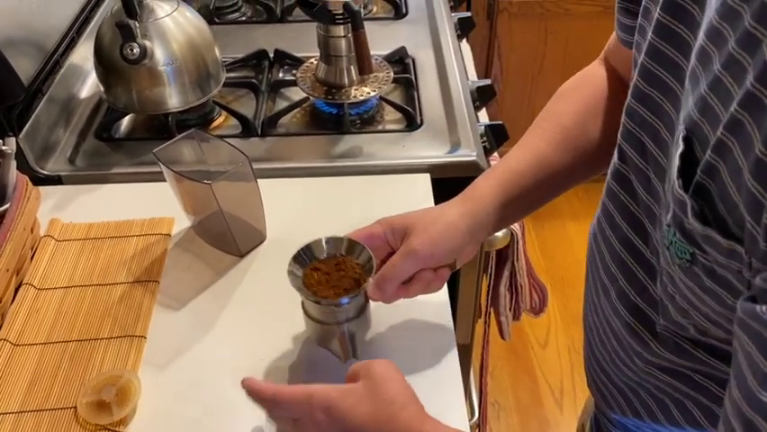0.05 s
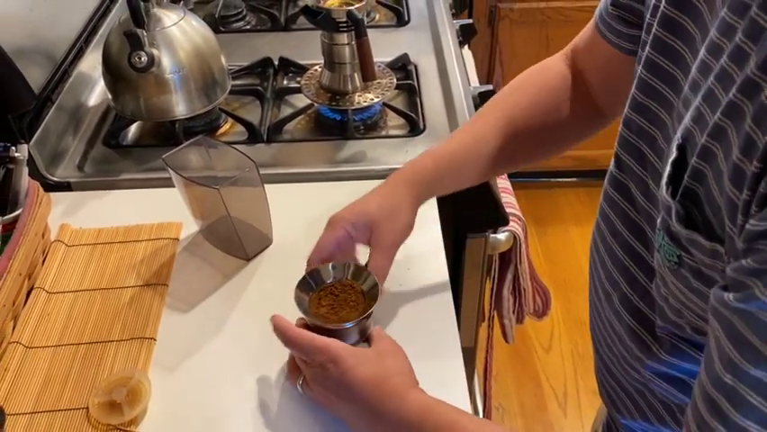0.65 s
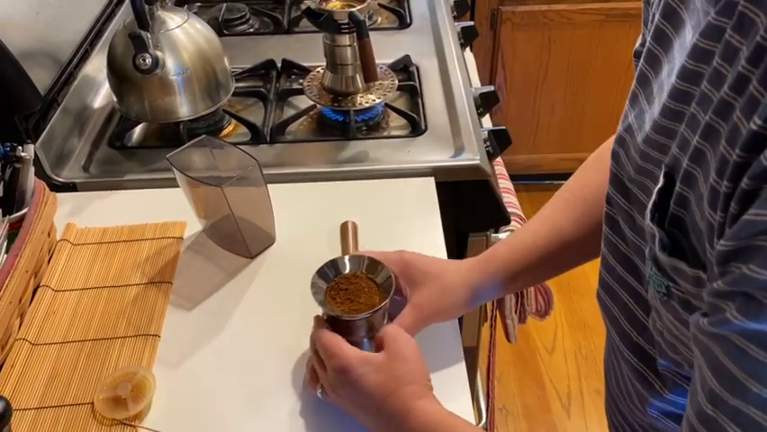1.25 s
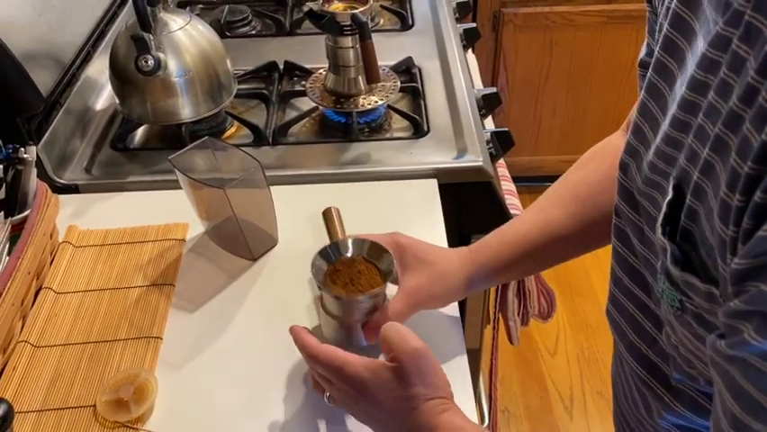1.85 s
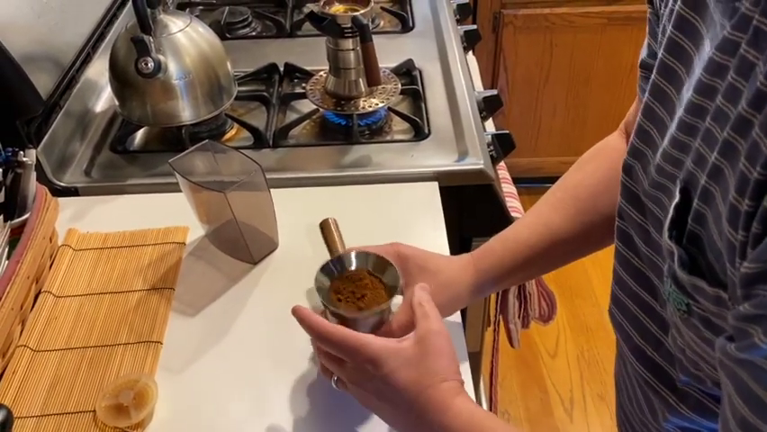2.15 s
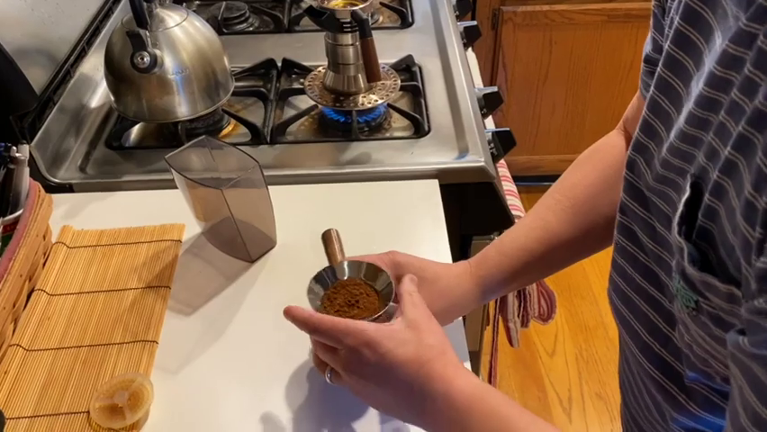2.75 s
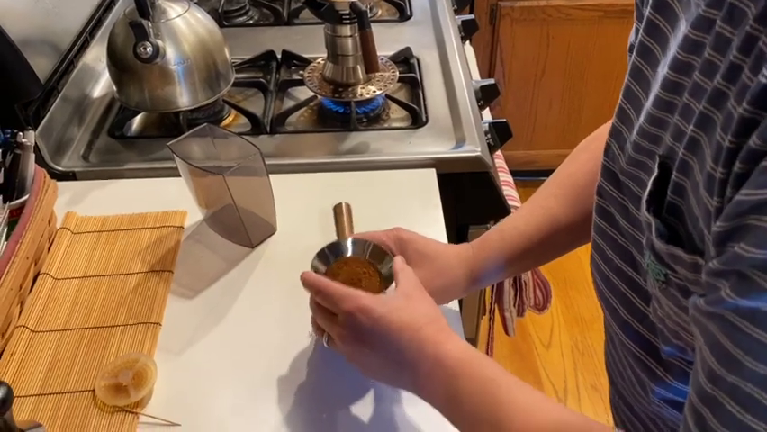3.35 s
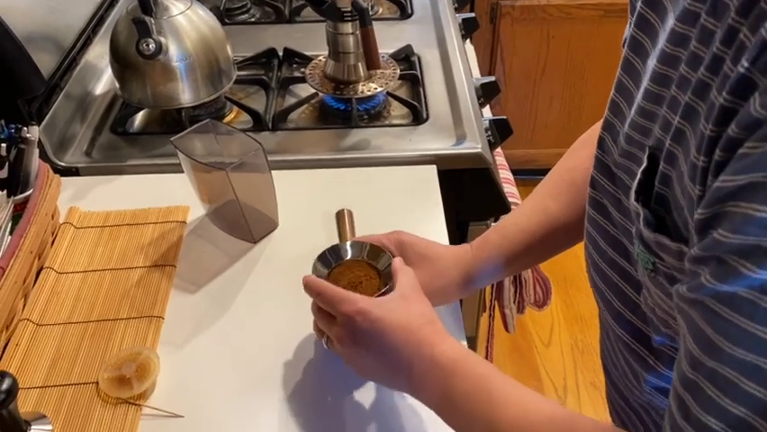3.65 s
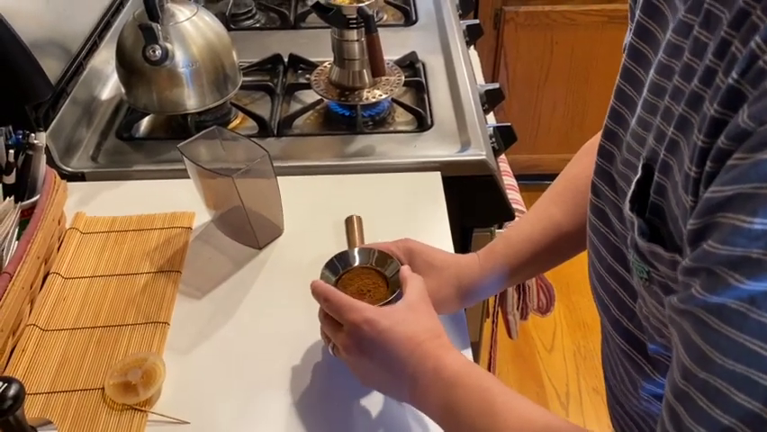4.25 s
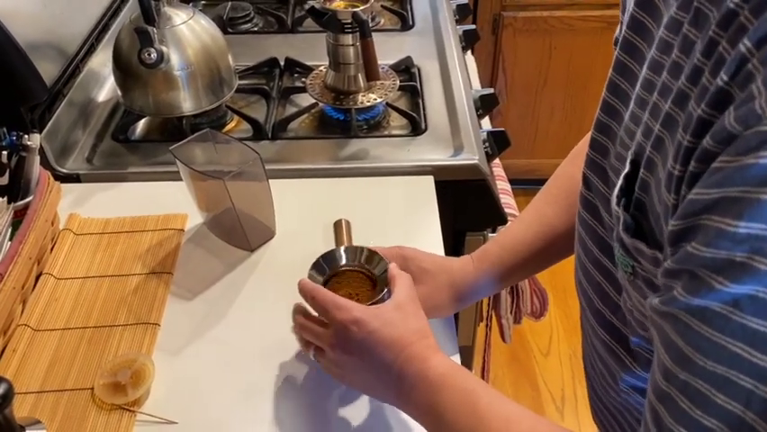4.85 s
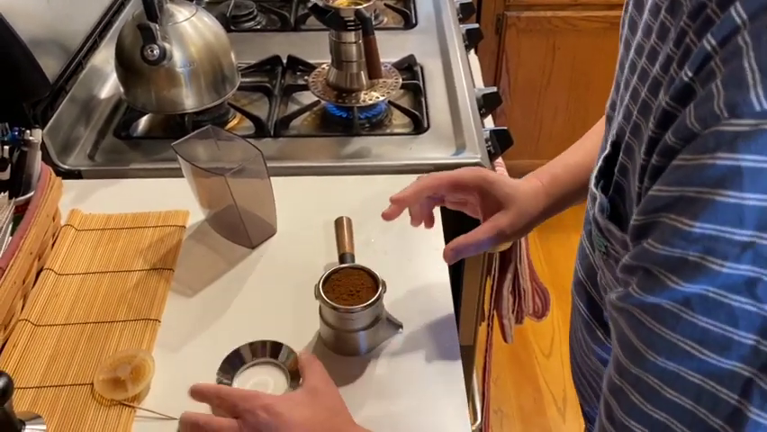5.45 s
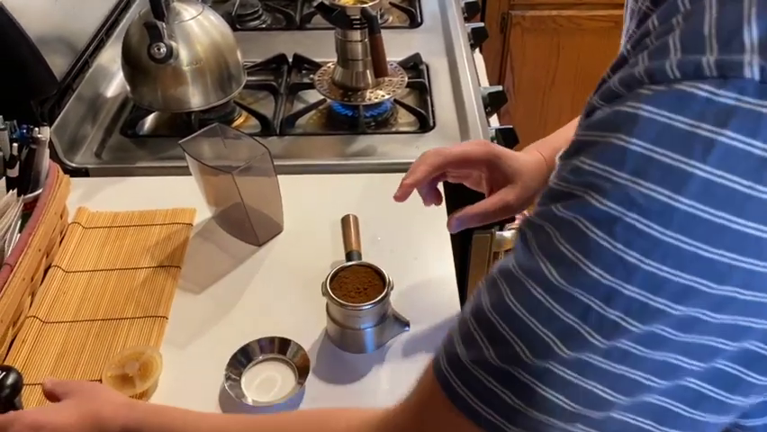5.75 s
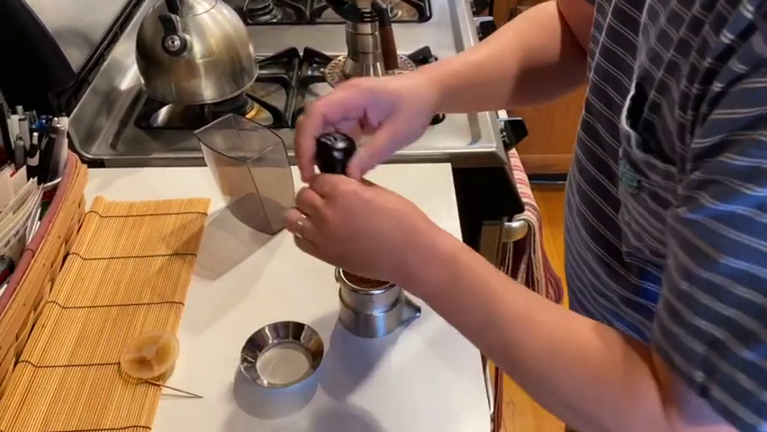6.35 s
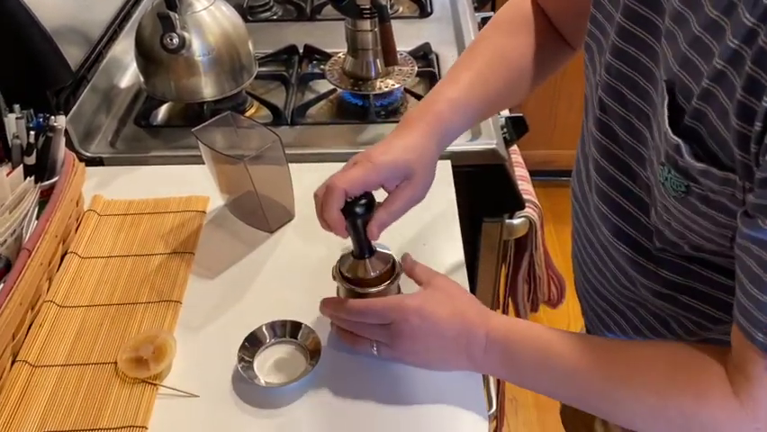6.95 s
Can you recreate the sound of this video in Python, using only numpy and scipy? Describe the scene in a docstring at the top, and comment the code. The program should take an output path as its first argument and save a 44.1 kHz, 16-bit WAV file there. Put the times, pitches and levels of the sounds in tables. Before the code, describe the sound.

In a small kitchen with a steady appliance hum and a faint gas flame hiss, coffee grounds are shaken level in a steel holder, its funnel buzzing on the rim. The holder lands softly, slides a little and is shaken again in a quick rhythm. It is then knocked hard on the counter seven times, and the funnel clatters briefly as it is set down. Everything is close and toward the left.

```python
"""A steel coffee basket in its holder, a dosing funnel on top, is shaken level and knocked on a counter.
The grounds slide and the loose funnel rattles on the rim; a few soft landings and seven firm knocks
ring the holder and boom in the cabinet. The funnel is lifted off and laid down, ringing; the tamper
is picked up faintly. Close stereo microphone, the handling to its left, in a small, live kitchen
where an appliance hums and a gas flame hisses softly."""
import sys
import numpy as np
from scipy import signal
from scipy.fft import rfft, irfft
from scipy.io import wavfile

SR = 44100
rng = np.random.default_rng(int(sys.argv[2]) if len(sys.argv) > 2 else 0)


def dump(signal):
    """Clip the signal to [-1, 1] and save it as 16-bit WAV at the path in sys.argv[1]."""
    limited = np.clip(np.atleast_2d(signal).T, -1, 1)
    pcm = np.round(limited * 32767).astype(np.int16)
    wavfile.write(sys.argv[1], SR, pcm)


N = 308259
T = np.arange(2 ** 15) / SR  # the time axis of one blow

# modes of the steel funnel, before fingers, basket or counter damp it: pitch_hz, relative_db, t60_s
FUNNEL_MODES = [(2140, -31.5, 0.15), (3360, -16.5, 0.27), (5830, -11.5, 0.4), (9960, 1, 0.35),
                (10060, -0.5, 0.053), (10070, -4, .1), (10850, -8, 0.23), (11300, -2.5, 0.052),
                (13880, 6.5, 0.041), (14150, -1, 0.064), (15240, 2, 0.086), (15510, 4.5, 0.043)]


def amp(db):
    """Decibels to gain."""
    return 10 ** (np.asarray(db) / 20)


def read(points, hz):
    """A table joined by straight lines over log frequency."""
    f, value = np.transpose(points)
    return np.interp(np.log(hz + 1), np.log(f), value)


def unit(x):
    """Scales to a mean energy of 1 per channel."""
    return x / np.sqrt(np.mean(np.sum(x ** 2, axis=-1)) + 1e-20)


def blow(x, db):
    """Scales a blow so that its energy, packed into a hundredth of a second, has this level."""
    return unit(x) * amp(db) * np.sqrt(SR / 100)


def add(mix, start_s, sound):
    """Mixes a sound in at its start time."""
    part = mix[max(round(start_s * SR), 0):][:len(sound)]
    part += sound[:len(part)]


def coloured(x, colour, size=4096):
    """Minimum-phase filter with the given spectrum."""
    log_gain = np.log(amp(read(colour, abs(np.fft.fftfreq(size, 1 / SR)))))
    taps = np.fft.ifft(np.exp(np.conj(signal.hilbert(log_gain)))).real
    return signal.fftconvolve(x, taps[:size // 2])[:len(x)]


def tilted(colour, db_per_octave):
    """A spectrum tilted about 1 kHz."""
    return [(hz, db + db_per_octave * np.log2(hz / 1000)) for hz, db in colour]


def dying(x, ring_times, count=9):
    """Lets each band of x die at its own speed."""
    centres, hz = np.geomspace(80, 16000, count), np.fft.rfftfreq(len(T), 1 / SR)
    spectrum = rfft(x)
    bands = [irfft(spectrum * read(np.c_[centres, weights], hz)) for weights in np.eye(count)]
    return sum(band * amp(-60 * T / read(ring_times, f)) for f, band in zip(centres, bands))


def modes(table, spread_db, detune):
    """Dying sines; each blow shares its force out differently, and the grip shifts the pitches."""
    hz, db, t60 = np.transpose(table)[:, :, None]
    share_db, phase = spread_db * rng.standard_normal(hz.shape), rng.random(hz.shape)
    hz = hz * (1 + detune * rng.standard_normal(hz.shape))
    t = T[:len(T) // 2]
    ring = amp(db + share_db - 60 * t / t60) * np.sin(2 * np.pi * (hz * t + phase))
    return unit(np.pad(ring.sum(0), (0, len(T) - len(t))))


def swell(seconds):
    """A soft start."""
    return 1 - np.exp(-(T / seconds) ** 2)


def ticks(per_s):
    """Tiny impulses of random time and strength."""
    return rng.standard_normal(len(T)) * (rng.random(len(T)) < per_s / SR)


def chatter(seconds, first, per_s):
    """One contact followed by a short crowd of tiny ones."""
    force = unit(ticks(per_s) * np.exp(-(T / seconds) ** 2 / 2))
    force[0] += first
    return force


def diffuse(pair):
    """Turns two unrelated signals into sound from all sides: shared in the bass, unrelated higher up."""
    # how alike the room is on both sides of the microphone: frequency_hz, coherence
    coherence = [(100, 0.89), (250, 0.59), (600, 0.082), (1200, 0.05), (16000, 0.11)]
    left, other = rfft(pair)
    alike = read(coherence, np.fft.rfftfreq(pair.shape[1], 1 / SR))
    return irfft([left, alike * left + np.sqrt(1 - alike ** 2) * other], pair.shape[1])


def room_tone(air_db=-60.5, left_over_right_db=7):
    """An appliance's steady hum over the low rumble of the room and the soft hiss of the gas flame."""
    # mains hum, before panning: pitch_hz, rms_db
    harmonics = [(59.9, -72), (119.7, -56.5), (179.6, -76.5), (239.4, -76), (479, -88), (598, -85.5)]
    # spectrum of rumble and hiss: frequency_hz, gain_db
    air_colour = [(12, -67), (20, -38.5), (55, -12), (91, -11), (123, -10.5), (146, -17.5), (234, -19.5),
                  (328, -28.5), (357, -30), (607, -36), (897, -44.5), (1910, -50.5), (2450, -57.5),
                  (2800, -44.5), (3200, -54.5), (11100, -57), (13200, -62), (16000, -53)]
    t = np.arange(N) / SR
    hum = sum(np.sqrt(2) * amp(db) * np.sin(2 * np.pi * (hz * t + rng.random())) for hz, db in harmonics)
    air = diffuse(np.array([coloured(noise, air_colour) for noise in rng.standard_normal((2, N))]))
    pan = amp([[left_over_right_db / 2], [-left_over_right_db / 2]])
    return (hum + unit(air) * np.sqrt(N) * amp(air_db)) * pan


def rattle(level_db, seconds, usual_db=-38.5):
    """Grounds hit the wall and the funnel buzzes on the rim, damped by the fingers."""
    # spectrum of grounds against steel: frequency_hz, gain_db
    grounds_colour = [(300, -27.5), (700, -10.5), (1200, 1), (2600, -7), (4000, -1), (5500, -6), (7500, 1),
                      (9000, -17), (10200, 8), (11500, -2), (12900, -20.5), (14100, -4), (15700, 4.5),
                      (16500, -14)]
    impacts = chatter(seconds, first=0.12, per_s=4500) * (0.54 + swell(0.0019))
    ring = modes(FUNNEL_MODES, spread_db=3.5, detune=0.0077) * np.exp(-T / 0.015) * swell(seconds / 3)
    ring_db = level_db - 2 + 0.6 * (level_db - usual_db)  # harder shakes ring more
    return blow(coloured(impacts, grounds_colour), level_db) + blow(ring, ring_db)


def shakes(slowest_swing_s=0.23, usual_swing_s=0.16, bounce_s=0.022, hard_push_db=-37):
    """Each swing rattles at the push and again at the return; a hard push bounces the funnel once."""
    # the holder swung to and fro: start_s, push_db, return_db
    pushes = [(0.002, -41, -50), (0.167, -39.5, -45), (0.321, -41.5, -66), (1.298, -45, -48.5),
              (1.535, -43, -37.5), (1.712, -40.5, -38), (1.869, -38.5, -46.5), (2.031, -39, -47),
              (2.183, -40, -45.5), (2.342, -38, -46), (2.504, -38, -44), (2.665, -44, -81)]
    out = np.zeros(N)
    swings = np.minimum(np.diff([row[0] for row in pushes], append=np.inf), slowest_swing_s)
    for (start_s, push_db, return_db), swing_s in zip(pushes, swings):
        bounce_db = push_db + 2.5 * min(push_db - hard_push_db, 0)
        return_s = 0.077 + 0.62 * (swing_s - usual_swing_s)  # about midway through the swing
        add(out, start_s, rattle(push_db, seconds=0.012))
        add(out, start_s + bounce_s, rattle(bounce_db, seconds=0.011))
        add(out, start_s + return_s, rattle(return_db, seconds=0.011))
    return out


def knocks(full_force_db=-14, rock_db=-3):
    """The holder strikes and rocks back: the counter top rings, loose steel clacks, the cabinet booms."""
    # the holder meets the counter: start_s, force_db, boom_re_force_db, clack_re_force_db, rock_back_s
    landings = [(0.431, -36.5, 6.5, -8.5, 0.0097), (0.453, -29, -3, -10.5, 0.011),
                (0.53, -40.5, 2, -5.5, .008), (0.607, -26, 0.5, -7, 0.0076), (0.625, -27.5, 4, -6.5, .009),
                (3.134, -17.5, 0, -10.5, .015), (3.375, -13, -2.5, -18.5, 0.015),
                (3.596, -13.5, -4.5, -12.5, 0.0071), (3.805, -15.5, 1, -8, .005),
                (4.018, -15, -7.5, -7, 0.0068), (4.2327, -15, -7, -8, 0.0058),
                (4.492, -14.5, -9.5, -8, .009), (6.963, -31.5, 4.5, -13.5, 0.0087)]
    # spectrum of the struck counter top: frequency_hz, gain_db
    top_colour = [(60, -26.5), (170, -1), (330, -1.5), (420, -12), (560, -0.5), (1200, -2.5), (1950, -11),
                  (2600, -14), (4000, -19.5), (8000, -36.5), (16000, -59)]
    # ring times of the counter top: frequency_hz, t60_s
    top_ring = [(150, .12), (600, 0.067), (2000, 0.0658), (8000, 0.045)]
    # spectrum of the loose steel: frequency_hz, gain_db
    clack_colour = [(500, -14.5), (2000, -0.5), (3200, -1.5), (4300, -7.5), (6000, 0), (8500, -9),
                    (10200, 1.5), (11800, 0.5), (13200, -12.5), (14600, 3.5), (15700, 0), (17000, -21.5)]
    # modes of the holder on the counter: pitch_hz, relative_db, t60_s
    holder_modes = [(337.7, 4, .15), (363, 1, 0.099), (433, -9, 0.13), (525.7, 3.5, 0.09), (557, -3, 0.065),
                    (690, 0.5, 0.09), (836, -2.5, 0.11), (942, -2, 0.16), (1010, -2.5, 0.14),
                    (1061, -3, 0.13), (1128, -4.5, 0.11), (1190, -16, .5), (1196, -16, .25),
                    (1366, -7.5, 0.06), (1450, -6.5, 0.13), (1766, -10.5, 0.09), (2457, -18.5, 0.067),
                    (2730, -10.5, 0.068)]
    # modes of counter and cabinet: pitch_hz, relative_db, t60_s
    cabinet_modes = [(80.7, -4.5, 0.46), (107.2, -2, 0.266), (137.2, -9, 0.24), (167.7, 1.5, 0.11),
                     (203.1, 2.5, 0.18), (235, -2, .2)]
    out = np.zeros(N)
    for start_s, force_db, boom_db, clack_db, rock_s in landings:
        colour = tilted(top_colour, 0.13 * (force_db - full_force_db))  # a softer knock is duller
        for contact_s, top_db in ((start_s, force_db), (start_s + rock_s, force_db + rock_db)):
            top = coloured(dying(rng.standard_normal(len(T)), top_ring), colour) * swell(0.0011)
            clack = coloured(chatter(seconds=0.0032, first=0.32, per_s=6000), clack_colour)
            add(out, contact_s, blow(top, top_db) + blow(clack, force_db + clack_db))
        ring = modes(holder_modes, spread_db=1, detune=0.0094) * swell(0.0029)
        ring_db = 0.8 * force_db - 8  # a soft landing has a larger share of ring
        boom = modes(cabinet_modes, spread_db=1, detune=0.015) * swell(0.0072)
        add(out, start_s, blow(ring, ring_db) + blow(boom, force_db + boom_db))
    return out


def funnel_ring(seated):
    """The struck funnel: short and unsteady in pitch on the basket, longer and clear on the counter."""
    # how strongly it rings when lying free: frequency_hz, gain_db
    laid_colour = [(2200, 6), (3400, 2), (5900, 11), (10000, 2), (10800, -12), (14000, -8), (15500, -8)]
    if seated:
        return modes(FUNNEL_MODES, spread_db=2.5, detune=0.0089) * np.exp(-T / 0.023)
    return coloured(modes(FUNNEL_MODES, spread_db=5, detune=0), laid_colour) * np.exp(-T / 0.076)


def clinks(funnel_off_s=5, contact_s=0.0037, gap_shrink=0.93, thump_hz=199.3, thump_t60_s=0.18):
    """The funnel bounces to rest, rings and, laid down, thumps the counter;
    later, a faint tick as a hand reaches for the tamper."""
    # steel touches basket or counter: start_s, contact_db, ring_db, first_gap_s, loss_per_bounce_db
    touches = [(0.461, -66, -35.5, 0.0029, 21), (0.607, -44.5, -26.5, .018, 2.4),
               (3.013, -64.5, -70, .003, 17), (5.3438, -28.5, -48, 0.0073, 4.5),
               (5.4295, -38.5, -50, .013, 3.5), (6.077, -72.5, -92, 0.0026, 12)]
    # spectrum of one contact: frequency_hz, gain_db
    contact_colour = [(100, -34), (200, 9), (330, -6.5), (700, 0.5), (1300, 2), (2400, -2.5), (4000, -11.5),
                      (6500, -16), (8500, -34.5), (10500, -18), (13000, -35.5), (15500, -20.5)]
    out = np.zeros(N)
    thump = np.sin(2 * np.pi * thump_hz * T) * amp(-60 * T / thump_t60_s) * swell(0.0036)
    for at_s, contact_db, ring_db, gap_s, loss_db in touches:
        seated = at_s < funnel_off_s
        if not seated:
            add(out, at_s, blow(thump, contact_db - 11.5))
        for bounce in range(5):
            contact = coloured(chatter(contact_s, first=0.39, per_s=5000), contact_colour)
            ring = funnel_ring(seated) * swell(contact_s / 2)
            add(out, at_s, (blow(contact, contact_db) + blow(ring, ring_db)) * amp(-bounce * loss_db))
            at_s += gap_s * gap_shrink ** bounce
    return out


def rubs(peak_share=0.58):
    """Fingers and the holder's foot slide; last, the tamper scrapes faintly as it is picked up."""
    # runs of fine, uneven slips: start_s, length_s, level_db, tilt_db_per_octave
    slides = [(0.96, 0.17, -66.5, -3), (1.163, 0.16, -55.5, 1), (1.294, 0.047, -51, -3.5),
              (6.338, 0.11, -70.5, 4)]
    # spectrum of the friction: frequency_hz, gain_db
    friction_colour = [(150, -50), (250, -1), (421, -8.5), (482, -0.5), (1650, -10), (7760, -32),
                       (8590, -44), (10200, -22), (14000, -52)]
    out = np.zeros(N)
    for start_s, length_s, level_db, tilt in slides:
        slips = unit(coloured(ticks(per_s=2500), tilted(friction_colour, tilt))) * np.sqrt(len(T))
        pressure = np.interp(T / length_s, [0, peak_share, 1], [0, 1, 0]) ** 0.5
        add(out, start_s, slips * amp(level_db) * pressure)
    return out


def reflections(early_db=-6, early_s=0.0045, onset_s=0.0022, echoes_per_s=5000):
    """Quick reflections from counter and stove, and the room's tail, for one place of the holder."""
    # reverberation of the kitchen: frequency_hz, t60_s
    room_ring = [(100, 0.36), (400, 0.43), (1200, 0.48), (3000, 0.45), (7000, 0.45), (11000, 0.19),
                 (16000, 0.2)]
    # how much the room returns: frequency_hz, gain_db
    tail_colour = [(100, -12), (400, -8), (1200, -4), (3000, -5), (7000, -7), (11000, -11), (16000, -13)]
    shape = (2, 2, len(T))
    early_taps, tail_taps = rng.choice([-1, 1], shape) * (rng.random(shape) < echoes_per_s / SR)
    early = unit(diffuse(early_taps) * swell(onset_s) * np.exp(-T / early_s))
    tail = unit(dying(diffuse(tail_taps), room_ring) * swell(onset_s))
    tail = np.array([coloured(side, tail_colour) for side in tail])
    return (amp(early_db) * early + tail) * amp([[1], [-1]])  # slightly to the left


def kitchen(x, right_lag_s=23e-6, moves_per_s=1.705, places=3):
    """The direct sound at the close microphone, plus reflections that change as the hands move."""
    # balance of near sounds at the microphone: frequency_hz, left_minus_right_db
    balance = [(100, 4.5), (300, 10), (600, 12), (1500, 7), (3500, 10.5), (6500, 3.5), (9500, -0.5),
               (16000, -0.5)]
    hz = np.fft.rfftfreq(len(T), 1 / SR)
    left = amp(read(balance, hz) / 2)
    right = np.exp(-2j * np.pi * hz * right_lag_s) / left
    lead = 64  # samples of room for the fractional delay
    direct = np.roll(irfft([left, right]), lead, axis=1)[:, :len(T) // 2]
    out = signal.fftconvolve(x[None], direct, axes=1)[:, lead:lead + N]
    for k in range(places):
        weight = np.sqrt(2 / places) * np.cos(np.pi * (moves_per_s * np.arange(N) / SR + k / places))
        out += signal.fftconvolve((x * weight)[None], reflections(), axes=1)[:, :N]
    return out


def scene():
    """All handling sounds in the kitchen, over its hum."""
    return kitchen(knocks() + shakes() + clinks() + rubs()) + room_tone()


def record(dry):
    """The loudest peaks are rounded off, then the highest treble is cut."""
    ceiling, edge_hz = 0.97, 16300
    rounded = dry / (1 + (dry / ceiling) ** 4) ** (1 / 4)
    lowpass = signal.firwin(511, edge_hz, window=("kaiser", 9), fs=SR)
    return signal.oaconvolve(rounded, lowpass[None], "same")


dry = scene()
out = record(dry)
dump(out)
```